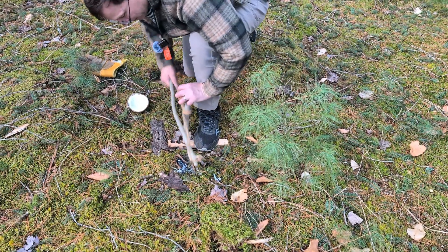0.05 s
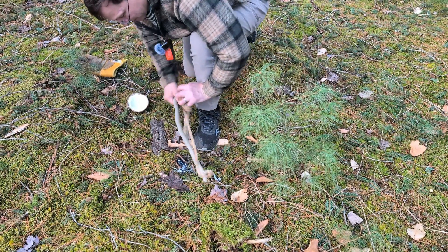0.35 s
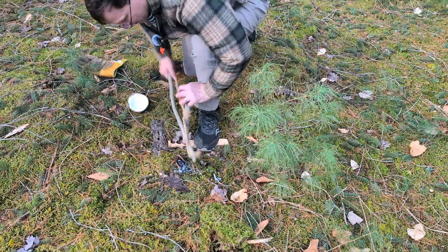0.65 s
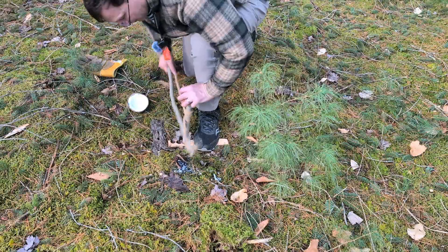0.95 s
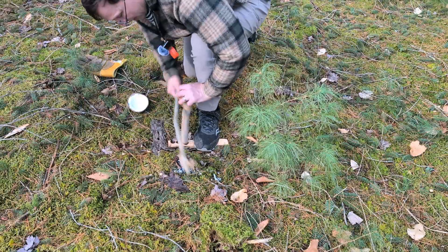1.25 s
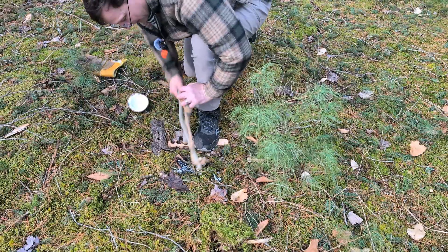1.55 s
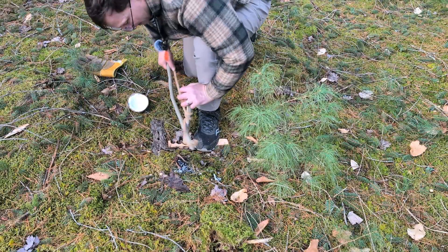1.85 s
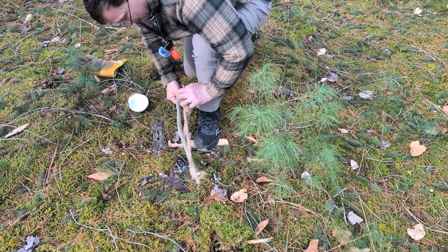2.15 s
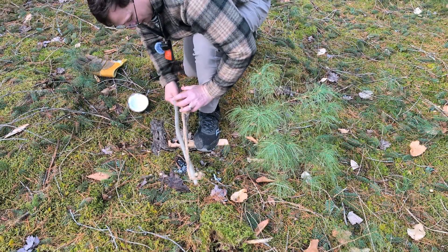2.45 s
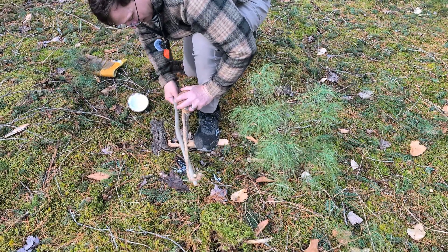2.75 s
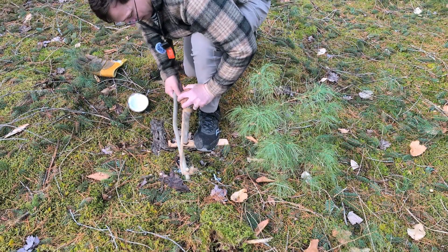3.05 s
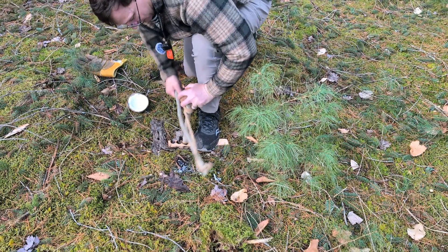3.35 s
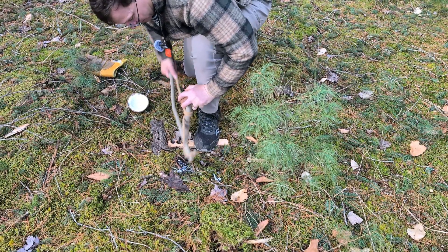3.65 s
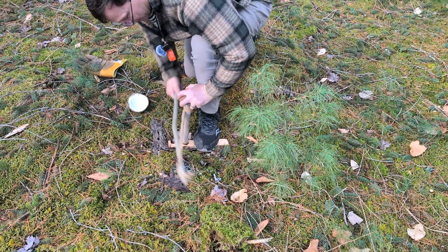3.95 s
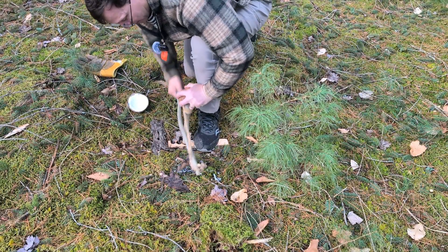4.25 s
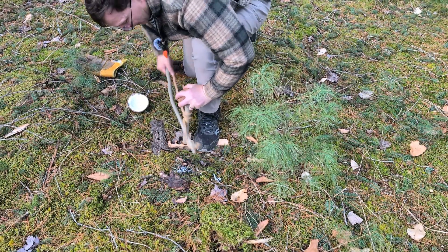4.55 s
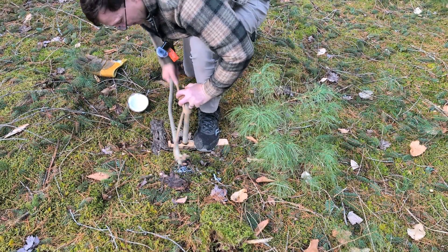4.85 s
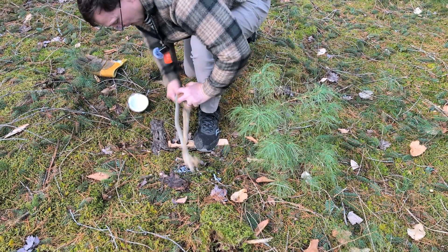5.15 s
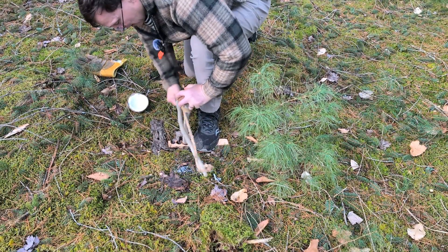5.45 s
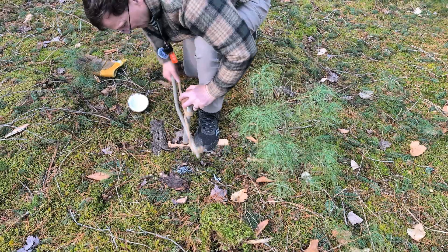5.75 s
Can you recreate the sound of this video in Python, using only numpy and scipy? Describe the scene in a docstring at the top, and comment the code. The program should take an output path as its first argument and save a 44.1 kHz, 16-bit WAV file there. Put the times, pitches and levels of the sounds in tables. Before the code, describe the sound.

A bow drill saws back and forth, its wooden spindle hissing and grinding with knocks and dry snaps, pausing briefly halfway.

```python
"""A bow drill on mossy ground in a still forest. For two seconds the bow saws steadily: each stroke
spins a wooden spindle that grinds in the fireboard and hisses in a dry husk socket. At many turns it
knocks in its hole; now and then it squeaks or the socket snaps. The arm stirs the air at the microphone.
Halfway the bow slows, the cord creaks, and dry snaps cluster in a short pause. Just after three seconds
the sawing resumes, with the hardest knocks near the end."""
import sys
import numpy as np
from scipy import signal
from scipy.fft import rfft, irfft, next_fast_len
from scipy.io import wavfile
from scipy.ndimage import map_coordinates

SR = 44100
rng = np.random.default_rng(int(sys.argv[2]) if len(sys.argv) > 2 else 0)


def wrap_up_sound(samples):
    """Save the sound to the file named by the first command line argument, as 16-bit audio."""
    columns = np.atleast_2d(samples).T
    # keep every value between -1 and 1, then stretch to whole-number steps
    tamed = np.clip(columns, -1, 1)
    steps = np.round(tamed * 32767).astype(np.int16)
    wavfile.write(sys.argv[1], SR, steps)


N = 255642


def amp(db):
    """Decibels to gain."""
    return 10 ** (np.asarray(db) / 20)


def unit(x):
    """x at rms 1."""
    return x / np.sqrt(np.mean(x ** 2) + 1e-20)


def curve(rows):
    """(t/s, value) points to one value per sample."""
    return np.interp(np.arange(N) / SR, *np.transpose(rows))


def wobble(rate_hz):
    """Smooth random curve with knots at rate_hz."""
    return map_coordinates(rng.standard_normal(int(N * rate_hz / SR) + 4), [np.arange(N) * rate_hz / SR])


def filtered(x, response):
    """x through a frequency response."""
    size = next_fast_len(N + SR // 2)
    return irfft(rfft(x, size) * response(np.fft.rfftfreq(size, 1 / SR)), size)[:N]


def coloured(x, spectrum):
    """x through (f/Hz, level/dB) points, at rms 1."""
    f_hz, db = np.transpose(spectrum)
    return unit(filtered(x, lambda hz: amp(np.interp(np.log(hz + 1), np.log(f_hz), db))))


def add(track, at_s, sound):
    """Mix a sound into the track."""
    part = track[max(round(at_s * SR), 0):][:len(sound)]
    part += sound[:len(part)]


def mode(t, hz, db, t60_s):
    """One damped resonance."""
    return amp(db - 60 * t / t60_s) * np.sin(2 * np.pi * hz * t)


def slips(rate_hz, spread_db):
    """Fibres catch and let go: random impulses of uneven size."""
    fires = rng.random(N) < rate_hz / SR
    size = amp(spread_db * np.clip(rng.standard_normal(N), -2.5, 2.5))
    return unit(fires * size * rng.choice([-1, 1], N))


# Ambient spectrum: f/Hz, level/dB
FOREST_SPECTRUM = [(59, -38.5), (100, -22), (177, -10.5), (306, -4), (698, -8.5), (1430, -16),
                   (2920, -19.5), (6080, -15.5), (8000, -44), (10400, -77.5), (17600, -120)]

def forest():
    """Faint, steady noise of the still forest."""
    return amp(-62) * coloured(rng.standard_normal(N), FOREST_SPECTRUM)


# Eddy strength: t/s, level/dB
EDDY_LEVELS = [(0.0, -32), (0.56, -28), (1.45, -24), (2.35, -29), (2.65, -43), (3.12, -44.5), (3.31, -27.5),
               (3.65, -29.5), (4.95, -24), (5.35, -25.5), (5.8, -29.5)]
# Eddy spectrum: f/Hz, level/dB
EDDY_SPECTRUM = [(8, 5.5), (25, -6), (50, -12.5), (90, -21.5), (160, -32), (400, -42), (1000, -100)]

def eddies():
    """Stirred air buffets the microphone."""
    return amp(curve(EDDY_LEVELS) - 3) * coloured(rng.standard_normal(N), EDDY_SPECTRUM)


def wafts(flip_s=0.011, lag_s=0.006, half_length_s=0.035):
    """The arm's turn from pull to push swings the air pressure from low to high."""
    out, t = np.zeros(N), np.arange(-SR // 8, SR // 8) / SR
    swing = np.tanh(t / flip_s) * np.exp(-((t - lag_s) / half_length_s) ** 2)
    starts_s, _, _, grind_db, _, _ = np.transpose(STROKES)
    for turn_s, pull_db, push_db in zip(starts_s[1::2], grind_db[::2], grind_db[1::2]):
        effort_db = 0.73 * pull_db + 0.27 * push_db
        add(out, turn_s + t[0], amp(effort_db + 28.5) * swing)
    return out


# Cord drags: t/s, half length/s, level/dB
CREAKS = [(2.3, 0.091, -50.5), (2.87, 0.15, -58), (3.33, 0.04, -49), (2.92, 0.039, -61),
          (4.929, 0.065, -40.5)]
# Creak spectrum: f/Hz, level/dB
CORD_SPECTRUM = [(150, -2.5), (300, -3), (450, -9.5), (600, -2.5), (850, -23), (2000, -12.5), (6000, -44)]

def cord_creaks():
    """The slack cord slips over the bow with a soft, low creak."""
    t = np.arange(N) / SR
    swell = sum(amp(db) * np.exp(-((t - at_s) / half_s) ** 2) for at_s, half_s, db in CREAKS)
    return swell * coloured(slips(rate_hz=860, spread_db=2.5), CORD_SPECTRUM)


# Spindle squeaks: t/s, level/dB, f/Hz
SPINDLE_SQUEAKS = [(0.2203, -16.5, 5390), (0.2358, -16.5, 5130), (0.607, -11, 4510), (0.7115, -19, 5320),
                   (1.0934, -19.5, 5580), (1.5118, -15, 5050), (1.932, -20, 5610), (1.9707, -18, 5060),
                   (3.795, -22, 5430), (5.0315, -16.5, 4980)]

def squeaks(half_length_s=0.0028):
    """Polished wood sings briefly and roughly, rising in pitch as the spindle speeds up."""
    out, t = np.zeros(N), np.arange(-SR // 80, SR // 80) / SR
    swell = np.exp(-(t / half_length_s) ** 2)
    for at_s, db, hz in SPINDLE_SQUEAKS:
        drift_rad = np.cumsum(rng.normal(0, 0.16, len(t)))
        tone = np.sin(2 * np.pi * hz * t * (1 + 7 * t) + drift_rad)
        add(out, at_s + t[0] + 0.00087, amp(db - 6.5) * swell * tone)
    return out


# Socket and cord snaps: t/s, level/dB, relative body level/dB
DRY_SNAPS = [(0.174, -34, 0), (0.3882, -24, -10), (0.596, -27, -5), (1.029, -27, 3.5), (1.229, -28, 1),
             (1.4477, -18.5, -2.5), (2.333, -30, -20), (2.88, -35.5, 3), (2.902, -31, -4),
             (3.0296, -25.5, -5.5), (3.0423, -22, -1.5), (3.0566, -32, -7), (3.0624, -17.5, -2.5),
             (3.0839, -17, -4.5), (3.1354, -35.5, -3), (3.1768, -18, 2), (3.185, -32.5, 5),
             (3.6778, -36, -5), (4.217, -15, -25), (4.5677, -19.5, -21), (4.9115, -17.5, -34),
             (4.974, -19, -8), (5.3614, -26.5, 3), (5.3748, -2.5, -32), (5.541, -13.5, -12)]
# Husk resonances: f/Hz, level/dB, t60/s
HUSK_MODES = [(1156, 5, 0.0081), (1400, -10.5, 0.019), (2350, 12, 0.0026), (4060, -4.5, 0.0071)]

def snaps(centre_hz=5580, ring_t60_s=0.0047, crack_t60_s=0.024, attack_s=0.00097):
    """A sudden slip gives a bright, rough crack and rings the dry husk."""
    out, t = np.zeros(N), np.arange(SR // 20) / SR
    attack = 1 - np.exp(-t / attack_s)
    for at_s, db, body_db in DRY_SNAPS:
        ring_hz = centre_hz * np.exp(rng.normal(0, 0.02))
        body = sum(mode(t, hz, rng.normal(mode_db, 0.83), t60_s) for hz, mode_db, t60_s in HUSK_MODES)
        drift_rad = np.cumsum(rng.normal(0, 0.41, len(t)))
        ring = 3.2 * amp(-60 * t / ring_t60_s) * np.sin(2 * np.pi * ring_hz * t + drift_rad)
        crack = 0.28 * amp(-60 * t / crack_t60_s) * rng.standard_normal(len(t))
        add(out, at_s, amp(db - 1) * attack * (amp(body_db + 3.5) * body + ring + crack))
    return out


# Fireboard resonances: f/ring f, level/dB, t60/s
BOARD_MODES = [(0.652, -30.5, 0.015), (1.001, 6.5, 0.013), (1.268, -9, 0.0041)]

def knock(ring_hz, thump_db, thump_hz, contact_t60_s=0.0069):
    """One contact: the board rings briefly and thumps the damping soil."""
    t = np.arange(SR // 12) / SR
    thump = mode(t, thump_hz, thump_db, t60_s=0.023)
    ring = sum(mode(t, ring_hz * ratio, db - 9.5, t60_s) for ratio, db, t60_s in BOARD_MODES)
    contact = amp(-6 - 60 * t / contact_t60_s) * rng.standard_normal(len(t))
    # minus: thump and ring blend into one full knock, with no hollow between them
    return ring - thump + contact


# Spindle knocks: t/s, level/dB, relative thump/dB, ring f/Hz, thump f/Hz, relative rebound/dB
SPINDLE_KNOCKS = [(0.390, -21.5, -5, 1110, 326, -28), (0.597, -29, 5.5, 980, 204, -18),
                  (0.823, -35.5, 8.5, 990, 290, -2), (1.0293, -27.5, 2.5, 970, 196, -14),
                  (1.1803, -19, -21, 1120, 250, -25), (1.2283, -14.5, -8, 1200, 280, -1),
                  (1.448, -21, -3.5, 900, 210, -9.5), (1.657, -14, -5, 1150, 163, -11),
                  (2.0649, -26.5, 1, 980, 190, -3.5), (2.8785, -30, -2, 840, 340, -18),
                  (3.2982, -20, 2, 960, 322, -7), (3.4637, -22.5, -13, 954, 220, -16),
                  (3.9192, -21, -5, 990, 252, -8.5), (4.1263, -24.5, -4, 1000, 230, -24),
                  (4.3496, -22.5, 5, 1100, 255, -10.5), (4.556, -20, -8.5, 1030, 198, -14),
                  (4.7604, -27, 10.5, 980, 159, -15), (4.768, -10, -13, 1160, 346, -24),
                  (5.1626, -17.5, -1.5, 1020, 194, -1), (5.3378, -14.5, -6, 1060, 251, -21),
                  (5.3595, -23.5, -2, 1020, 243, -11), (5.3729, -11, -18, 980, 340, -27),
                  (5.5428, -7, -12, 1050, 295, -27), (5.5469, -5, -3.5, 1000, 287, -34),
                  (5.5498, -2, -10.5, 1020, 330, -27)]

def knocks(rebound_s=0.005545, cutoff_hz=1690):
    """The reversed cord tips the spindle against its hole; it rebounds once. Soft wood dulls both."""
    out = np.zeros(N)
    for at_s, db, thump_db, ring_hz, thump_hz, rebound_db in SPINDLE_KNOCKS:
        add(out, at_s, amp(db) * knock(ring_hz, thump_db, thump_hz))
        add(out, at_s + rebound_s, amp(db + rebound_db) * knock(ring_hz, thump_db=-1.5, thump_hz=296))
    return signal.sosfilt(signal.butter(4, cutoff_hz, fs=SR, output="sos"), out)


def chirps(rate_hz, centre_hz, half_length_s, spread_db):
    """Brief stick-slip whistles, each with its own pitch and slight glide."""
    out, t = np.zeros(N), np.arange(-SR // 150, SR // 150) / SR
    times_s = np.flatnonzero(rng.random(N) < rate_hz / SR) / SR
    for at_s, (pitch, size, glide, length) in zip(times_s, rng.standard_normal((len(times_s), 4))):
        hz = centre_hz * np.exp(0.12 * np.clip(pitch, -2, 2))
        swell = np.exp(-(t / (half_length_s * np.exp(0.46 * length))) ** 2)
        tone = np.sin(2 * np.pi * hz * t * (1 + 5 * glide * t))
        add(out, at_s, amp(spread_db * min(size, 2)) * swell * tone)
    return unit(out)


def wandering_contact(x, depth_db, width_hz, life_s):
    """The contact point wanders, so narrow bands swell and fade."""
    hz, times_s, spectra = signal.stft(x, SR, nperseg=512)
    grid = np.meshgrid(hz / width_hz, times_s / life_s, indexing="ij")
    patches = map_coordinates(rng.standard_normal((160, 900)), grid, order=1, mode="wrap")
    return unit(signal.istft(spectra * amp(depth_db * patches), nperseg=512)[1][:N])


# Bow strokes, pull first, then alternating: start/s, end/s, hiss/dB, grind/dB, run-up/s, run-down/s
STROKES = [(-0.044, 0.158, -36.5, -41, 0.04, 0.051), (0.155, 0.372, -38.5, -42, 0.059, 0.034),
           (0.376, 0.576, -37.5, -38.5, 0.043, 0.065), (0.561, 0.801, -37.5, -41.5, 0.1, 0.058),
           (0.794, 1.01, -39.5, -40.5, 0.045, 0.078), (1.003, 1.211, -38, -40, 0.04, 0.039),
           (1.207, 1.441, -38.1, -40, 0.054, 0.11), (1.419, 1.637, -37.5, -42, 0.056, 0.041),
           (1.63, 1.843, -37.0, -40, 0.07, 0.087), (1.836, 2.046, -38, -41.5, 0.051, 0.036),
           (2.044, 2.289, -38, -41.5, 0.047, 0.11), (2.269, 2.356, -53.5, -58, 0.045, 0.029),
           (2.371, 2.444, -52, -59.5, 0.041, 0.034), (2.458, 2.597, -49.5, -57.5, 0.046, 0.072),
           (2.595, 2.701, -54, -62.5, 0.052, 0.042), (2.679, 2.818, -51, -63, 0.05, 0.08),
           (2.792, 2.949, -52.5, -62.5, 0.044, 0.045), (3.171, 3.44, -37.5, -46.5, 0.14, 0.027),
           (3.444, 3.654, -38.1, -44.5, 0.053, 0.039), (3.664, 3.893, -36.5, -42.5, 0.124, 0.048),
           (3.9, 4.119, -36.5, -44, 0.061, 0.08), (4.117, 4.322, -36.3, -43, 0.067, 0.03),
           (4.321, 4.541, -37, -41.5, 0.064, 0.069), (4.54, 4.748, -36.8, -42, 0.036, 0.041),
           (4.736, 4.967, -37.7, -39.5, 0.05, 0.093), (4.944, 5.151, -37, -41, 0.043, 0.042),
           (5.143, 5.334, -38.5, -40, 0.031, 0.06), (5.339, 5.523, -34.0, -39, 0.047, 0.057),
           (5.523, 5.708, -37.5, -42, 0.032, 0.079), (5.711, 5.917, -40.5, -44.1, 0.096, 0.04)]

def bowing(idle_hiss_db=-73, idle_grind_db=-71.5, reversal_half_s=0.015):
    """Each stroke runs up, holds and runs down. Gives hiss/dB, grind/dB and lean (0 pull, 1 push)."""
    hiss, grind = np.full(N, amp(idle_hiss_db)), np.full(N, amp(idle_grind_db))
    ramp = lambda share: np.sin(np.pi / 2 * np.clip(share, 0, 1))
    lean = []
    for k, (start_s, end_s, hiss_db, grind_db, up_s, down_s) in enumerate(STROKES):
        t = np.arange(max(start_s, 0), end_s, 1 / SR)
        speed = ramp((t - start_s) / up_s) * ramp((end_s - t) / down_s)
        friction = speed ** 1.5
        easing = ((t - start_s) / (end_s - start_s) - 0.57) ** 2  # hand presses hardest past the middle
        add(hiss, start_s, amp(hiss_db - 14.5 * easing) * friction)
        add(grind, start_s, amp(grind_db - 24.5 * easing) * friction)
        lean += [(start_s + reversal_half_s, k % 2), (end_s - reversal_half_s, k % 2)]
    return 20 * np.log10(hiss), 20 * np.log10(grind), curve(lean)


# Socket spectra: f/Hz, level/dB
SOCKET_PULL = [(1200, -35), (2150, -13.5), (2800, -10), (3600, -8), (4300, -6.5), (5000, -6.5), (5400, -2),
               (6000, -7), (6800, -6), (7300, -17), (8500, -19)]
SOCKET_PUSH = [(1200, -24.5), (2150, -18), (2700, -4.5), (3700, -9), (4400, -5), (5000, -4.5), (5400, -3),
               (5750, -2.5), (6700, -6), (7300, -19), (8500, -19.5)]
# Fireboard spectra: f/Hz, level/dB
BOARD_PULL = [(100, -4.5), (200, -7.5), (380, -14.5), (560, -22.5), (750, -11.5), (940, -9.5), (1130, -2),
              (1450, -8.5), (1780, -7.5), (2120, -22), (2800, -16), (4000, -31), (7000, -41.5)]
BOARD_PUSH = [(100, -7), (270, -3), (420, -17.5), (580, -17), (750, -9), (900, -5), (1090, -0.5),
              (1420, -13), (1750, -5), (2150, -14), (2600, -15.5), (4000, -23.5), (7000, -46)]

def grinding(nominal_spin_hz=50):
    """Both spindle ends scrape; the uneven tip bears harder once a turn and spins faster mid-stroke."""
    hiss_db, grind_db, lean = bowing()
    # pull and push lean the spindle on opposite walls, each with its own resonances
    walls = lambda x, pull, push: (1 - lean) * coloured(x, pull) + lean * coloured(x, push)
    speed = amp(0.28 * np.minimum(hiss_db + 35.5, 0))
    turns = np.cumsum(nominal_spin_hz * speed * np.exp(0.18 * wobble(8.1))) / SR
    bearing = np.sin(2 * np.pi * turns) + 0.42 * np.sin(4 * np.pi * turns)
    chatter = wobble(260)
    grit = slips(rate_hz=240, spread_db=1)  # charred crumbs break, ticking through both ends

    socket = walls(slips(rate_hz=9000, spread_db=1.5) + 0.63 * grit, SOCKET_PULL, SOCKET_PUSH)
    socket = wandering_contact(socket, depth_db=3, width_hz=266, life_s=0.018)
    socket += 0.56 * chirps(rate_hz=200, centre_hz=5633, half_length_s=0.0029, spread_db=1.5)
    socket *= amp(0.25 * bearing + chatter + 1.77 * wobble(70))

    board = walls(slips(rate_hz=3500, spread_db=1) + 0.18 * grit, BOARD_PULL, BOARD_PUSH)
    board = wandering_contact(board, depth_db=3.5, width_hz=151, life_s=0.025)
    board *= amp(0.38 * bearing + 1.7 * chatter + 0.39 * wobble(90))
    return amp(hiss_db + 0.76) * unit(socket) + amp(grind_db + 1.5) * unit(board)


def scene():
    """Mono mix in the open, no echo."""
    drill = grinding() + knocks() + snaps() + squeaks() + cord_creaks()
    return (drill + wafts() + eddies() + forest())[None]


def record(dry):
    """Steep microphone band limit."""
    cutoff_hz = 7280
    return filtered(dry[0], lambda hz: 1 / np.sqrt(1 + (hz / cutoff_hz) ** 44))[None]


dry = scene()
out = record(dry)
wrap_up_sound(out)
```